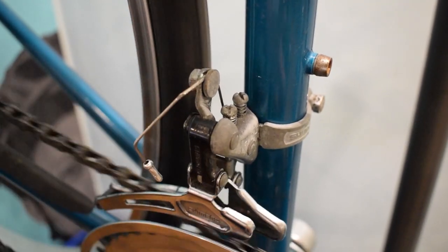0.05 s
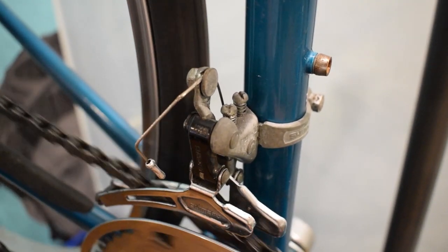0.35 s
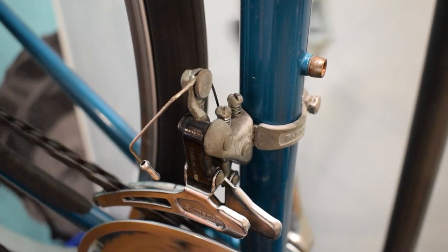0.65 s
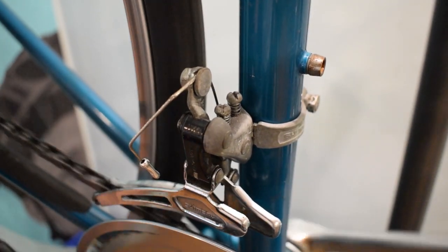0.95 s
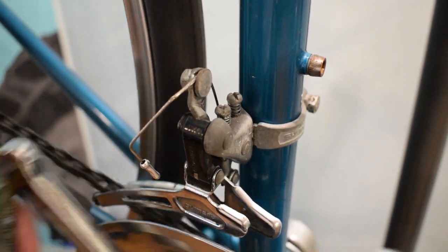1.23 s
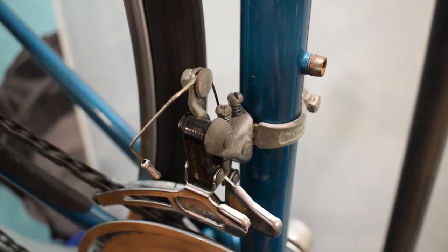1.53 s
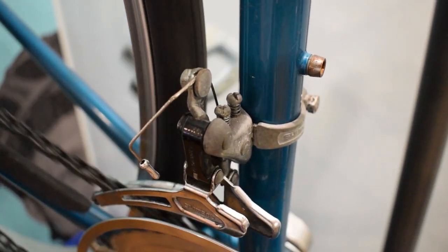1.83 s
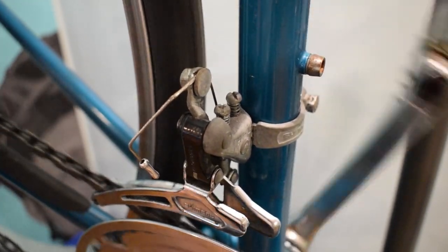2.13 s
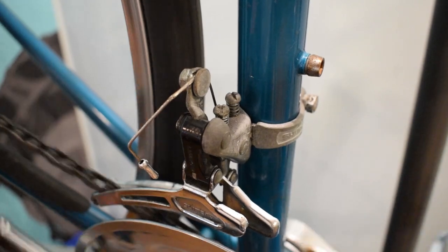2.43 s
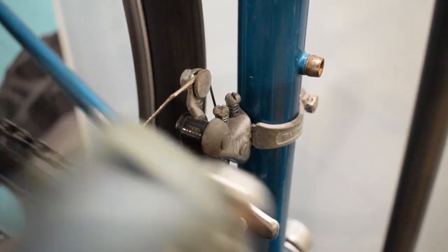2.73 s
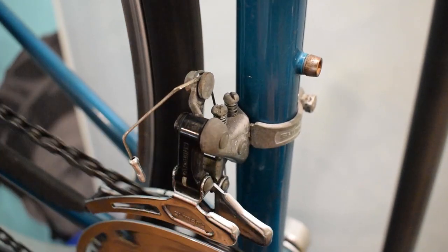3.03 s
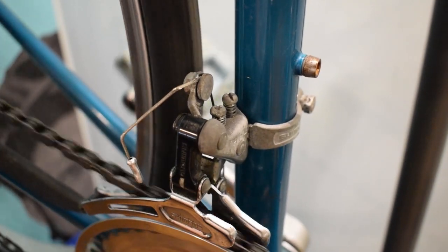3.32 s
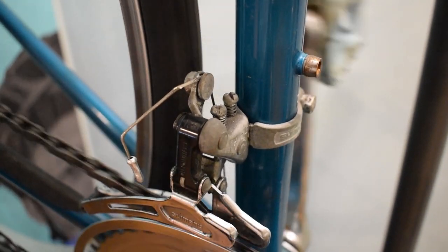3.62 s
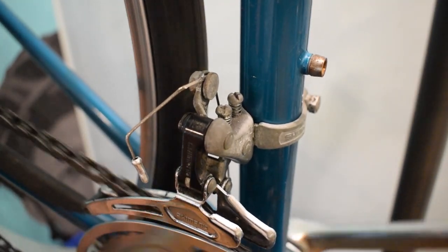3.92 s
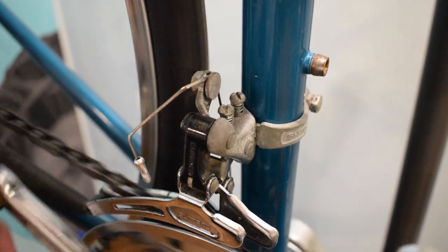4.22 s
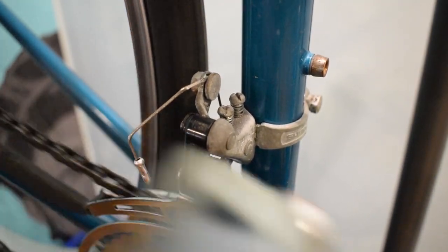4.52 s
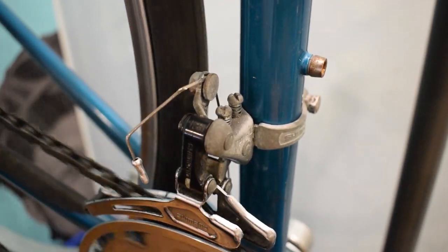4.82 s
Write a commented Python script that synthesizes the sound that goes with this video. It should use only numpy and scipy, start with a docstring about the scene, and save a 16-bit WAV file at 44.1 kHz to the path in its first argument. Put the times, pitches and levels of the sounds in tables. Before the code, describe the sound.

A bicycle chain clanks and rattles over its gears, with two short runs of rapid freewheel clicking, close up.

```python
"""Faint ticks and knocks of a bicycle chain over room hiss: the cranks are being turned by hand, close up.
The chain clanks through the front derailleur and sets its cage ringing, then rattles over the chainrings.
Twice the rear wheel overruns and the freewheel's pawls click into their teeth, ringing the hub.
Pulling taut, the chain thuds through the frame; later it scrapes and rasps along the cage.
Each hit is shaped noise, ringing modes or both, and the room's hard walls add a short tail."""
import sys
import numpy as np
from scipy import signal
from scipy.fft import rfft, irfft, next_fast_len
from scipy.io import wavfile
from scipy.ndimage import map_coordinates

SR = 44100
rng = np.random.default_rng(int(sys.argv[2]) if len(sys.argv) > 2 else 0)


def master(y):
    """Save y as 16-bit WAV."""
    cut = np.clip(np.atleast_2d(y).T, -1, 1)
    pcm = np.round(cut * 32767)  # scale
    wavfile.write(sys.argv[1], SR, pcm.astype(np.int16))


N = 223133
TIME = np.arange(N) / SR
AGE = np.arange(int(.38 * SR)) / SR  # seconds since a hit
MID_ONLY = np.array([[1], [0]])  # layers are built as two rows: mid and side

# room hiss (f/Hz, level/dB)
AIR_EQ = [(25, -43), (55, -22), (100, -12.5), (150, -6), (230, 5.5), (300, -1), (400, 2), (510, -4.5),
          (700, -1), (1190, -1), (1700, -5.5), (3400, -9), (8600, -21), (11000, -20), (16000, -33)]
# low room tones (f/Hz, level/dB)
HUM_TONES = [(100, -84.5), (123, -82), (218, -80), (249, -77)]
# soft midrange hush (f/Hz, level/dB)
HUSH_EQ = [(100, -30), (300, -17), (400, -3), (700, 6), (950, 2), (1300, -21), (3000, -60)]

# the slack chain is set shaking (t/s, hold/s, body level/dB, bright level/dB)
CHAIN_SHAKES = [(0.498, 0.03, -48, -34.5), (0.998, 0.88, -46.5, -49.5), (1.916, 0.03, -68, -43.5),
                (2.422, 0.12, -43.5, -45.5), (3.028, 0.032, -56, -45), (3.453, 0.069, -72, -45.5),
                (3.776, 0.049, -52.5, -57), (4.005, 0.18, -49.5, -49.5), (4.783, 0.23, -54.5, -54.5)]
# ring of the running chain (f/Hz, level/dB)
SING_EQ = [(300, -28), (950, -19), (1130, -7), (1225, 0.5), (1330, -28), (1600, -16), (2050, -11),
           (2500, -49), (6000, -73)]
# stretches of steady drive (start t/s, end t/s, links per second, tick level/dB, knock level/dB)
DRIVE_RUNS = [(0.005, 0.23, 25.7, -51, -47), (0.766, 0.93, 54, -57, -67), (2.034, 2.2, 26, -76, -59.5),
              (4.297, 5.05, 30.6, -56, -57)]
# tick of a meshing link (f/Hz, level/dB)
TICK_EQ = [(60, -62), (700, 0), (3000, -31), (5600, -3.5), (7200, -7.5), (8500, -6.5), (9500, -3),
           (10500, -16), (13000, -38)]

# side plates hit teeth and cage (t/s, level/dB, hardness/dB, link f/Hz, decay multiplier)
PLATE_KNOCKS = [(0.052, -41.5, 3.5, 2050, 0.86), (0.175, -29.5, 2, 2047, 0.33),
                (0.257, -37, -1, 2060, 0.44), (0.393, -38.5, 0, 1970, 0.92), (0.414, -37, -2.5, 1885, 0.9),
                (0.451, -47, -5.5, 2050, .6), (0.464, -31, 4.5, 1920, 0.69), (0.475, -30, 1, 3080, 0.45),
                (0.481, -24.5, 9, 2660, 1.05), (0.487, -32.5, 6, 2860, 1.5), (0.54, -39.5, -4, 2040, 0.97),
                (0.604, -37.5, 3, 1180, 0.54), (0.616, -39.5, 2.5, 1930, 1.6), (1.817, -42, 8.5, 2520, 1.1),
                (1.829, -36.5, 1.5, 2820, 1.3), (1.883, -37, -4, 1160, 0.92), (1.896, -32.5, 7, 2170, 0.74),
                (2.87, -43.5, 3, 2470, 1.05), (2.93, -41, 4, 1800, 1.1), (2.996, -39, 1.5, 3240, 0.59),
                (3.03, -44.5, -4.5, 1495, 1.1), (3.143, -44, 9.5, 1290, 0.52), (3.231, -41.5, 5, 1090, 0.4),
                (3.2974, -37.5, 7.5, 1340, 0.74), (3.3124, -36, 2, 1340, 0.35),
                (3.3244, -33.5, 6.5, 1270, 0.13), (3.331, -34.5, -0.5, 1235, 1.6),
                (3.3415, -37, -7.5, 2750, 0.14), (3.3459, -35.5, 0, 2510, 0.59),
                (3.409, -43, 12, 2460, 0.82), (3.512, -38.5, 10.5, 2620, 0.74), (3.535, -44, 7, 2560, .8),
                (3.627, -42, 8, 760, 0.86), (3.946, -39.5, 1.5, 1240, 1.6), (3.979, -34, 9.5, 1980, 0.77),
                (4.011, -41, 4, 1200, 0.92)]
# body of a link's knock (f/Hz, level/dB)
LINK_BODY_EQ = [(120, -57.5), (200, -8), (334, -17.5), (399, -6.5), (506, -15), (814, -3), (1060, -5.5),
                (1260, 4), (1490, -4), (2030, 0.5), (2220, -3), (2710, -3.5), (4000, -3.5), (5200, -13.5),
                (8800, -120)]
# bright clink of a link (f/Hz, level/dB)
LINK_CLINK_EQ = [(1410, -41.5), (2400, 2), (2710, 3.5), (3360, -5), (4170, 0), (4740, 2.5), (5610, 3.5),
                 (6240, 1), (8010, 0), (9670, -3), (12000, -16), (15600, -53), (22000, -120)]
# fizz of the side plates' sharp edges (f/Hz, level/dB)
LINK_EDGE_EQ = [(300, -93), (4000, -82), (8000, 6.5), (11000, 3), (13000, -5.5), (15500, -14)]
# modes of the chainrings (f/Hz, level/dB, t60/s)
CHAINRING_MODES = [(2540, 0, 0.22), (2550, 1.5, 0.16), (4500, -8, 0.27), (5120, 1, 0.2), (5800, 0, .35),
                   (5680, 5.5, 0.36), (6480, 11, 0.1), (6670, 9, 0.28), (7870, 0, 0.37), (8400, -6, 0.36),
                   (9600, -22, 0.21), (11000, -19, .28)]

# the chain snaps against the derailleur cage (t/s, level/dB)
CAGE_HITS = [(0.2882, -20.5)]
# crack of that hit (f/Hz, level/dB)
CLANK_EQ = [(240, -99), (400, -29), (700, -13.5), (1100, -10), (1690, -8), (2060, -1.5), (2510, -10.5),
            (3340, -9.5), (3890, -13), (4330, -8), (6420, -4.5), (7030, -3.5), (8820, -16), (11200, -14.5),
            (14100, -31), (15000, -66)]
# modes of the cage (f/Hz, level/dB, t60/s)
CAGE_MODES = [(1800, 14, 0.032), (2070, -7, .06), (2650, -8, .2), (4360, -4, 0.2), (5300, -5, 0.19),
              (5360, -7, 0.2), (5740, -6, .24), (6160, -8, 0.16), (6960, -8, 0.18), (6940, -7, 0.2),
              (7360, -6, .17), (10980, -6, .07)]

# a roller of the taut chain seats on a tooth (t/s, thock level/dB, click level/dB)
ROLLER_HITS = [(0.414, -38, -43), (0.539, -42.5, -52), (0.654, -45.5, -57), (0.7119, -41.5, -40.5),
               (3.587, -50.5, -54), (3.688, -48, -53), (3.7415, -41, -37), (3.789, -44.5, -47),
               (3.814, -60, -50), (3.879, -51, -63), (3.92, -46, -51.5), (4.114, -41.5, -41),
               (4.133, -48, -45), (4.23, -46.5, -62), (4.302, -46.5, -54), (4.712, -51, -52),
               (4.758, -44.5, -58), (4.818, -44, -47), (4.843, -49.5, -49.5), (4.882, -48, -47),
               (4.943, -48, -61), (4.97, -47, -47), (5.033, -61, -51)]
# the roller's thock (f/Hz, level/dB)
THOCK_EQ = [(150, -39), (550, -7.5), (720, -7), (840, 3), (1020, -7), (1230, -3.5), (1500, -8),
            (2000, -5.5), (3000, -23), (6000, -48)]
# the roller's click (f/Hz, level/dB)
ROLLER_CLICK_EQ = [(400, -24), (1400, 1.5), (2050, -1.5), (3000, -2), (4000, -1.5), (5000, -9),
                   (8500, -9.5), (11000, -14.5), (16000, -36)]

# a pawl drops into a freewheel tooth (t/s, click level/dB, body level/dB)
PAWL_DROPS = [(0.9618, -43, -36), (0.9926, -43, -33.5), (1.0237, -33, -34.5), (1.0593, -48, -36.5),
              (1.091, -31, -31), (1.1524, -31.5, -33), (1.2162, -29.5, -28.5), (1.2799, -32.5, -31.5),
              (1.3417, -32.5, -32.5), (1.411, -33.5, -34), (1.45, -37.5, -34.5), (1.4804, -31.5, -32.5),
              (1.5119, -37, -38.5), (1.5419, -32, -35.5), (1.582, -46, -40), (1.6155, -33, -34),
              (1.6792, -39, -36.5), (1.711, -37, -34), (1.772, -38.5, -36.5), (2.2427, -41.5, -36),
              (2.2784, -36.5, -34.5), (2.31, -44, -37), (2.3407, -37.5, -35.5), (2.3709, -38, -35.5),
              (2.402, -42.5, -29), (2.435, -35.5, -32), (2.4603, -44, -36.5), (2.4713, -46, -40),
              (2.4897, -29, -31), (2.5558, -29, -33.5), (2.589, -41, -40), (2.617, -38, -33)]
# modes of the freewheel and hub (f/Hz, level/dB)
HUB_MODES = [(1135, -3), (1200, -3.5), (1290, -8.5), (1385, -6.5), (1965, -3), (2090, -2), (2760, -18),
             (3208, -36), (3655, 0), (3983, -10), (4285, -6), (4801, -25), (5555, -27), (5910, -13.5),
             (6250, -24), (6400, -7.5), (7490, -10.5), (8130, -8.5), (8446, -12.5), (8780, -15), (9716, -8),
             (10486, -40), (11218, -42), (11493, -11.5), (14098, -21)]
# the pawl's noisy snap (f/Hz, level/dB)
PAWL_SNAP_EQ = [(180, -57), (300, -23.5), (600, -8), (960, -19), (1150, -2), (1430, 1), (1660, -23),
                (2030, 3), (2440, -11.5), (3640, -4.5), (6410, -27), (6850, -31), (9880, -16.5),
                (16000, -34)]
# crack of the pawl's tip (f/Hz, level/dB)
PAWL_TIP_EQ = [(60, -90), (300, -30), (2200, -2.5), (3700, 3.5), (5100, 1), (8300, -1), (11500, -4),
               (12800, -14.5), (16000, -24)]

# the chain seats and jolts the frame (t/s, level/dB, deepest mode f/Hz)
FRAME_JOLTS = [(1.844, -52, 224.7), (2.414, -45.5, 248), (2.453, -53, 213.7), (3.336, -50.5, 207),
               (3.354, -58.5, 93.8), (3.741, -56, 215.6), (3.981, -51.5, 203), (4.113, -51.5, 208.6)]
# shudder of the frame (f/Hz, level/dB)
FRAME_EQ = [(30, -42), (70, -11), (160, 0), (260, 10), (400, 5.5), (650, 5), (1000, 9), (2000, -30)]
# a pawl locks into its tooth as the drive takes up (t/s, level/dB)
CLACK_HITS = [(1.867, -29), (2.649, -35.5), (2.7197, -32.5), (3.251, -44.5), (3.289, -68), (3.3885, -34)]
# dull clack of that lock (f/Hz, level/dB)
CLACK_EQ = [(40, -72), (100, -59), (600, -18), (900, -7.5), (1300, 1), (1600, -5.5), (1950, 7.5),
            (2250, -4), (2700, -17.5), (4300, -12), (10000, -19), (16000, -48)]

# the chain drags along the cage (t/s, hold/s, level/dB)
SCRAPE_STROKES = [(3.055, 0.088, -44), (3.303, .025, -39.5)]
# resonances of the scraped cage (f/Hz, level/dB)
SCRAPE_EQ = [(60, -65), (300, -38), (750, -10.5), (920, -3), (1040, -12), (1270, 4.5), (1450, 0),
             (1700, -6.5), (2100, -2.5), (2400, -19), (3000, -23), (3200, -6.5), (3600, -25), (9000, -35),
             (16000, -39)]
# short, rough rubs on the cage's edge (t/s, hold/s, level/dB)
RASP_STROKES = [(3.34, 0.0067, -42.5), (3.402, .006, -58), (3.427, 0.01, -54), (3.473, 0.013, -56),
                (3.51, 0.01, -55.5), (3.543, .01, -57)]

# decay of the room's tail (f/Hz, t60/s)
REVERB_DECAY = [(150, 1), (1000, 0.32), (4000, 0.4), (8000, 0.22), (15000, 0.68)]
# tone of the room's tail (f/Hz, level/dB)
REVERB_EQ = [(200, 0), (1200, -2.5), (3000, -6.5), (7000, -1.5), (14000, -9.5)]
# stereo width, as EQ on the side channel (f/Hz, level/dB)
SIDE_EQ = [(60, -25), (130, -37), (300, -26), (600, -17.5), (1200, -34.5), (2200, -23.5), (4500, -10),
           (9000, -7.5), (14000, -0.5)]


def amp(db):
    """Decibels to gain."""
    return 10 ** (np.asarray(db) / 20)


def unit(x):
    """Scale to rms 1."""
    return x / np.sqrt(np.mean(x ** 2) + 1e-20)


def unit_attack(x):
    """Scale a hit to rms 1 over its first five milliseconds."""
    return x / np.sqrt(np.mean(x[..., :SR // 200] ** 2) + 1e-20)


def along(points, hz):
    """Read a curve of (f/Hz, value) points on a log frequency axis."""
    f, v = np.transpose(points)
    return np.interp(np.log(hz + 1), np.log(f + 1), v)


def wobble(rate):
    """A smooth random curve with rate knots a second."""
    return map_coordinates(rng.standard_normal(int(N * rate / SR) + 4), [TIME * rate])


def filtered(x, gain):
    """Apply a gain that is a function of frequency."""
    size = next_fast_len(N + SR // 4)
    return irfft(rfft(x, size) * gain(np.fft.rfftfreq(size, 1 / SR)), size)[..., :N]


def colour(x, eq):
    """Run a whole track through an EQ curve."""
    return filtered(x, lambda hz: amp(along(eq, hz)))


def response(eq, size=1024):
    """Minimum-phase impulse response of an EQ curve, as one row."""
    gain = amp(along(eq, np.fft.rfftfreq(size, 1 / SR)))
    cepstrum = irfft(np.log(gain + 1e-6))
    fold = 1 + np.sign(size // 2 - np.arange(size))
    fold[0] = 1
    return irfft(np.exp(rfft(cepstrum * fold)))[None]


def fade(t60, hold=0):
    """Exponential decay after a hit and an optional hold, both in seconds."""
    return amp(-60 * np.maximum(AGE - hold, 0) / t60)


def swell(s, hold, rise_db_per_s, fall_db_per_s):
    """An envelope that rises to 1 at time s, holds and dies away."""
    before, after = np.maximum(s - TIME, 0), np.maximum(TIME - s - hold, 0)
    return amp(-rise_db_per_s * before - fall_db_per_s * after)


def excite(force, impulse):
    """One hit: a force played through an impulse response, its attack normalised."""
    return unit_attack(signal.fftconvolve(force, impulse, axes=1)[:, :len(AGE)])


def burst(eq, envelope):
    """A hit of mid and side noise, shaped by an envelope and then an EQ curve."""
    return excite(rng.standard_normal((2, len(AGE))) * envelope, response(eq))


def grains(eq, rate, t60, rub):
    """Noise of rms 1 made of tiny uneven contacts, rate a second, over a steady rub."""
    contacts = (rng.random(N) < rate / SR) * rng.random(N) ** 2
    power = np.abs(signal.fftconvolve(contacts, fade(t60) ** 2)[:N])
    envelope = np.sqrt(power + rub ** 2)
    return unit(colour(envelope * rng.standard_normal((2, N)), eq))


def ringing(hz, strength, phase, decay):
    """Sum of decaying modes, mid and side."""
    angle = 2 * np.pi * hz[:, None] * AGE[:decay.shape[1]] + phase
    return strength @ (np.sin(angle.astype(np.float32)) * decay)


def steel(modes, detune=0.0047, rise_s=0.00028):
    """One hit on a steel part: its modes ring out, slightly shifted by the chain's load."""
    hz, db, t60 = np.transpose(modes)
    tuned = hz * (1 + detune * rng.standard_normal(len(hz)))
    decay = fade(t60[:, None]) * (1 - np.exp(-AGE / rise_s))
    phase = rng.uniform(0, 2 * np.pi, (2, len(hz), 1))
    return unit_attack(ringing(tuned, amp(db), phase, decay))


def add(track, s, sound):
    """Mix a sound into a track at time s."""
    start = max(round(s * SR), 0)
    part = track[:, start:start + sound.shape[1]]
    part += sound[:, :part.shape[1]]


def room_tone(hiss_db=-58.5):
    """A bed of steady room hiss with a few wavering low tones."""
    hum = sum(amp(db) * np.sqrt(2) * np.sin(2 * np.pi * hz * TIME + 0.46 * wobble(12))
              for hz, db in HUM_TONES)
    hiss = unit(colour(rng.standard_normal((2, N)), AIR_EQ))
    return amp(hiss_db) * hiss + hum * MID_ONLY


def hush(db=-64, fall_db_per_s=7):
    """A soft, wide hush that slowly fades away; its rows are left and right."""
    return amp(db - fall_db_per_s * TIME) * unit(colour(rng.standard_normal((2, N)), HUSH_EQ))


def chain_rattle(body_trim_db=-4, bright_trim_db=-5, sing_db=-61):
    """Rollers of the running chain touch the teeth in many tiny contacts, louder while it shakes."""
    body, bright = amp(-70), amp(-55)  # the floor between shakes
    for s, hold, body_db, bright_db in CHAIN_SHAKES:
        shake = swell(s, hold, rise_db_per_s=180, fall_db_per_s=82)
        body = np.hypot(body, amp(body_db) * shake)
        bright = np.hypot(bright, amp(bright_db) * shake)
    rollers = amp(body_trim_db) * body * grains(LINK_BODY_EQ, rate=170, t60=0.016, rub=0.46)
    sing = amp(sing_db) * grains(SING_EQ, rate=82, t60=0.027, rub=0.15)
    jingle = amp(bright_trim_db) * bright * grains(LINK_CLINK_EQ, rate=260, t60=0.064, rub=0.27)
    return rollers + sing + jingle


def link_ticks(scatter_db=0.5, inner_db=-4, jitter_s=0.00097):
    """Under steady drive each link meshes with a high tick and a soft knock; inner links knock less."""
    out = np.zeros((2, N))
    for start, end, rate, tick_db, knock_db in DRIVE_RUNS:
        for k, s in enumerate(np.arange(start, end, 1 / rate)):
            tick = amp(tick_db + scatter_db * rng.standard_normal()) * burst(TICK_EQ, fade(t60=0.079))
            knock = amp(knock_db + inner_db * (k % 2)) * burst(LINK_BODY_EQ, fade(t60=0.24))
            add(out, s + rng.normal(0, jitter_s), tick + knock)
    return out


def plate_knocks(body_db=-3, ring_db=-5, clink_db=-8, edge_db=-15, chainring_db=-18):
    """Links land on the teeth: a briefly pitched knock, and a clink that sets the chainrings ringing."""
    out = np.zeros((2, N))
    for s, db, hard_db, hz, length in PLATE_KNOCKS:
        ring_env = fade(length * 0.06) * (1 - np.exp(-AGE / 0.00027))
        ring = unit_attack(np.sin(2 * np.pi * hz * AGE) * ring_env) * MID_ONLY
        knock = amp(body_db) * burst(LINK_BODY_EQ, fade(length * 0.12)) + amp(ring_db) * ring
        clink_env = fade(length * 0.11) + amp(-16.5) * fade(length * 0.12)
        clink = amp(clink_db) * burst(LINK_CLINK_EQ, clink_env)
        clink += length * amp(chainring_db) * steel(CHAINRING_MODES)
        edges = amp(edge_db) * burst(LINK_EDGE_EQ, fade(length * 0.15))
        # a harder hit trades body for sparkle
        hit = amp(-hard_db) * knock + amp(0.5 * hard_db) * clink + amp(1.08 * hard_db) * edges
        add(out, s, amp(db) * hit)
    return out


def cage_clank(ring_db=-23, body_t60=0.065, crack_t60=0.028):
    """A hard snap of the chain cracks against the thin derailleur cage and leaves it ringing."""
    out = np.zeros((2, N))
    for s, db in CAGE_HITS:
        blow = burst(CLANK_EQ, fade(body_t60) + fade(crack_t60))
        add(out, s, amp(db) * (blow + amp(ring_db) * steel(CAGE_MODES)))
    return out


def roller_seats(t60=0.037, shiver_db=-17, shiver_t60=0.16):
    """A roller lands on its tooth: a compact thock and a crisp click, after which the links shiver."""
    out = np.zeros((2, N))
    envelope = fade(t60) + amp(shiver_db) * fade(shiver_t60)
    for s, thock_db, click_db in ROLLER_HITS:
        add(out, s, amp(thock_db) * burst(THOCK_EQ, envelope))
        add(out, s, amp(click_db) * burst(ROLLER_CLICK_EQ, envelope))
    return out


def ghost_drops(long_gap_s=0.05, lag_s=0.037, click_trim_db=-17.5, body_trim_db=-12):
    """The two pawls take turns: in a long gap the other drops faintly, about half a tooth later."""
    gaps = np.diff([row[0] for row in PAWL_DROPS])
    return [(s + lag_s, click_db + click_trim_db, body_db + body_trim_db)
            for (s, click_db, body_db), gap in zip(PAWL_DROPS, gaps) if gap > long_gap_s]


def freewheel(snap_db=-3, crack_db=-1, buzz_db=-9, side_db=-3, crossover_hz=2400, rise_cycles=2.2):
    """Each pawl cracks into a tooth, chatters, rebounds and settles, ringing the hub's modes."""
    out = np.zeros((2, N))
    hz, mode_db = np.transpose(HUB_MODES)
    is_low = hz < crossover_hz
    mode_t60 = 0.03 * (hz[:, None] / 3000) ** -.25  # low modes last longer
    decay = (fade(mode_t60) * (1 - np.exp(-AGE * hz[:, None] / rise_cycles)))[:, :SR // 20]
    snap_env = fade(0.022, hold=0.0038) + amp(-12) * fade(0.08)
    crack_env = fade(0.028) + amp(-1) * fade(0.015)
    buzz_env = amp(buzz_db) * fade(0.17) / np.linalg.norm(fade(0.17))
    for s, click_db, body_db in PAWL_DROPS + ghost_drops():
        # the turning wheel offers a new tooth each time, so strength and tuning shift a little
        strength = amp(mode_db + 2 * rng.standard_normal(len(hz)))
        tuned = hz * (1 + .008 * rng.standard_normal(len(hz)))
        phase = rng.uniform(0, 2 * np.pi, (2, len(hz), 1))
        contacts = np.zeros(len(AGE))
        contacts[0] = 1
        for delay_s, bounce_db in (0.0042, -8), (0.017, -14):  # rebound, then settle
            contacts[round(SR * delay_s * amp(1.5 * rng.standard_normal()))] += amp(bounce_db)
        force = (contacts + buzz_env * rng.standard_normal(len(AGE)))[None]
        hollow = excite(force, ringing(tuned, strength * is_low, phase, decay))
        ring = excite(force, ringing(tuned, strength * ~is_low, phase, decay))
        crack = burst(PAWL_TIP_EQ, signal.fftconvolve(contacts, crack_env)[:len(AGE)])
        snap = burst(PAWL_SNAP_EQ, snap_env)
        add(out, s, amp(click_db) * (ring + amp(crack_db) * crack))
        add(out, s, amp(body_db) * (hollow + amp(snap_db) * snap))
    # the clicks carry little deep bass
    return colour(out, [(50, -25), (300, -0.5)]) * amp([[0], [side_db]])


def frame_thuds(boom_db=-1, shudder_db=2, rise_s=0.0094, sharp_share=0.153, sag_s=0.061):
    """The chain pulls taut: the frame shudders and booms, starting sharp and sinking as strain lets go."""
    out = np.zeros((2, N))
    bent_age = AGE + sharp_share * sag_s * (1 - np.exp(-AGE / sag_s))
    attack = 1 - np.exp(-AGE / rise_s)
    for s, db, hz in FRAME_JOLTS:
        boom = amp(boom_db) * np.sin(2 * np.pi * hz * bent_age) * fade(t60=0.54)
        shudder = amp(shudder_db) * burst(FRAME_EQ, fade(t60=0.4))
        add(out, s, amp(db) * (boom + shudder) * attack)
    return out


def pawl_clacks(t60=0.039):
    """A pawl locks into its tooth as the drive takes up, giving a short, hollow clack."""
    out = np.zeros((2, N))
    for s, db in CLACK_HITS:
        add(out, s, amp(db) * burst(CLACK_EQ, fade(t60)))
    return out


def cage_scrape():
    """Link plates stick and slip along the cage and stir its resonances."""
    pressure = sum(amp(db) * swell(s, hold, rise_db_per_s=400, fall_db_per_s=700)
                   for s, hold, db in SCRAPE_STROKES)
    return pressure * grains(SCRAPE_EQ, rate=180, t60=0.036, rub=0.24)


def cage_rasp(start_hz=2940, sag_hz_per_s=1500, width_hz=380, grit_db=4, slips_per_s=260):
    """A rough, narrow band of noise that sinks as the chain sticks and slips on the cage's edge."""
    pressure = sum(amp(db) * swell(s, hold, rise_db_per_s=1300, fall_db_per_s=700)
                   for s, hold, db in RASP_STROKES)
    centre_hz = start_hz - sag_hz_per_s * (TIME - RASP_STROKES[0][0])
    phase = 2 * np.pi * np.cumsum(centre_hz) / SR
    band = wobble(width_hz) * np.cos(phase) + wobble(width_hz) * np.sin(phase)
    grit = amp(grit_db * np.tanh(wobble(slips_per_s)))
    return pressure * unit(band * grit) * MID_ONLY


def wall_reverb(send, segments=12, rise_s=0.0024):
    """The walls answer with a diffuse tail, new for each segment as the crank and hand move."""
    out = np.zeros((2, N))
    edges = np.linspace(0, N, segments + 1).astype(int)
    for start, end in zip(edges, edges[1:]):
        hz, t, spectrum = signal.stft(rng.standard_normal((2, len(AGE))), SR, nperseg=256)
        decay = amp(-60 * t / along(REVERB_DECAY, hz)[:, None])
        tail = signal.istft(spectrum * decay, SR, nperseg=256)[1][:, :len(AGE)]
        tail *= 1 - np.exp(-AGE / rise_s)
        tail /= np.linalg.norm(tail[0])
        add(out, start / SR, signal.fftconvolve(send[None, start:end], tail, axes=1))
    return colour(out, REVERB_EQ)


def scene(clank_side_db=2, thud_side_db=-12, air_side_db=2):
    """Mix bicycle and room to close-up stereo: centred in the bass, wide in the treble."""
    wheel = freewheel()
    chain = plate_knocks() + roller_seats() + pawl_clacks() + cage_scrape() + cage_rasp()
    clank = cage_clank() * amp([[0], [clank_side_db]])
    walls = wall_reverb(send=amp(-5) * wheel[0] + amp(-1.5) * chain[0] + amp(1) * clank[0])
    frame = frame_thuds() * amp([[0], [thud_side_db]])
    air = room_tone() * amp([[0], [air_side_db]])
    mid, side = wheel + chain + clank + walls + frame + chain_rattle() + link_ticks() + air
    side = colour(side, SIDE_EQ)
    return np.array([mid + side, mid - side]) + hush()


def record(dry, low_cut_hz=45, top_hz=16100):
    """Master EQ: roll off the deep bass and cut everything above top_hz."""
    return filtered(dry, lambda hz: (hz < top_hz) * hz ** 2 / np.sqrt(hz ** 4 + low_cut_hz ** 4))


dry = scene()
out = record(dry)
master(out)
```